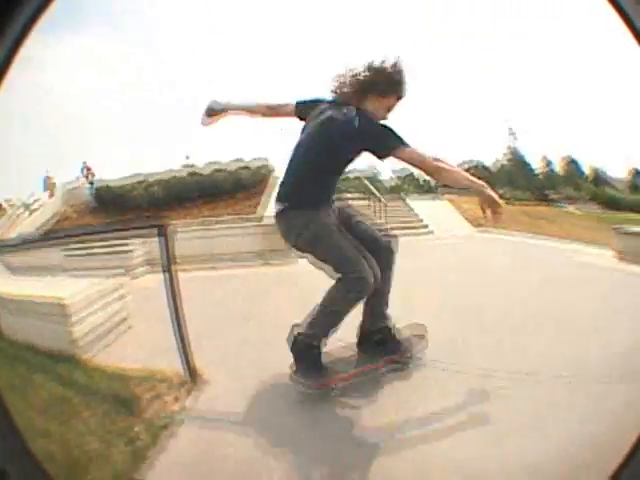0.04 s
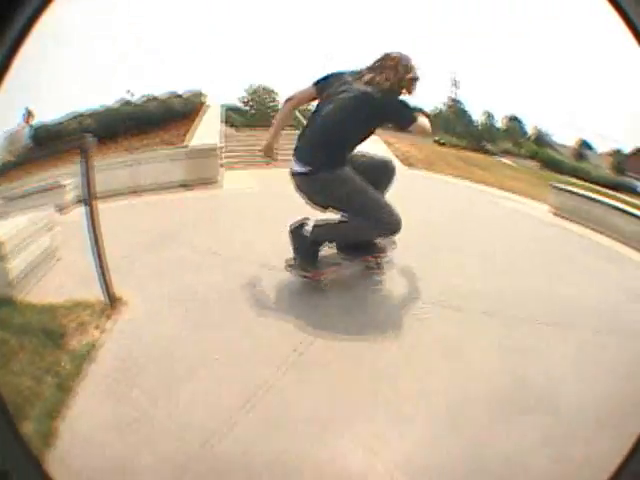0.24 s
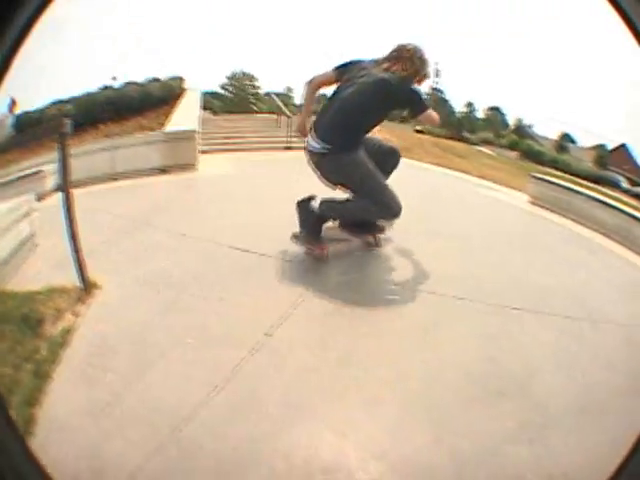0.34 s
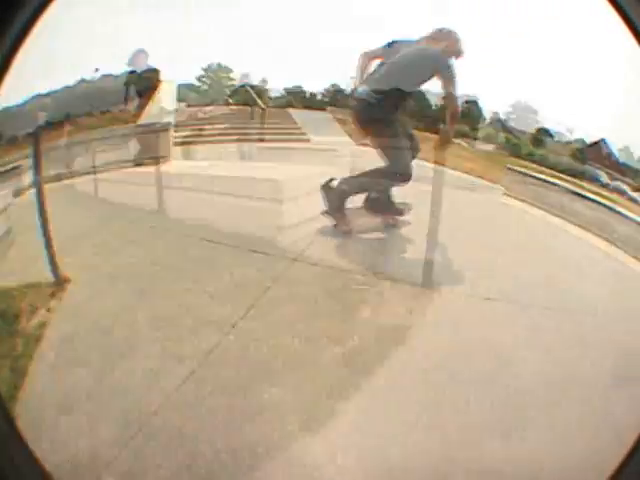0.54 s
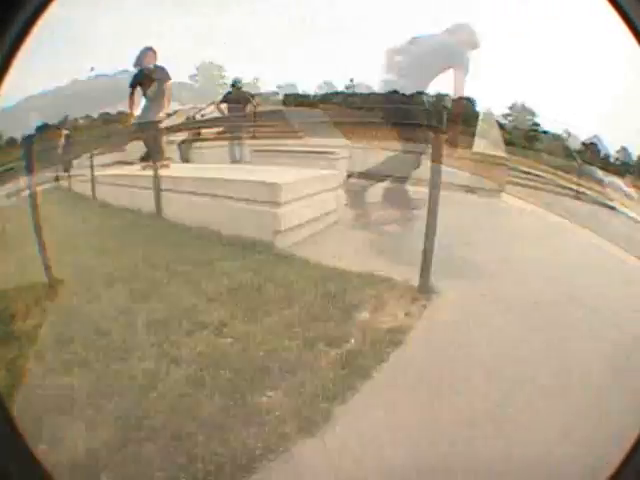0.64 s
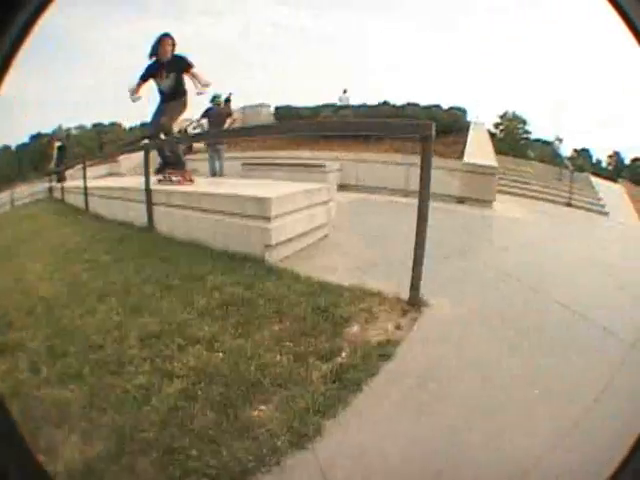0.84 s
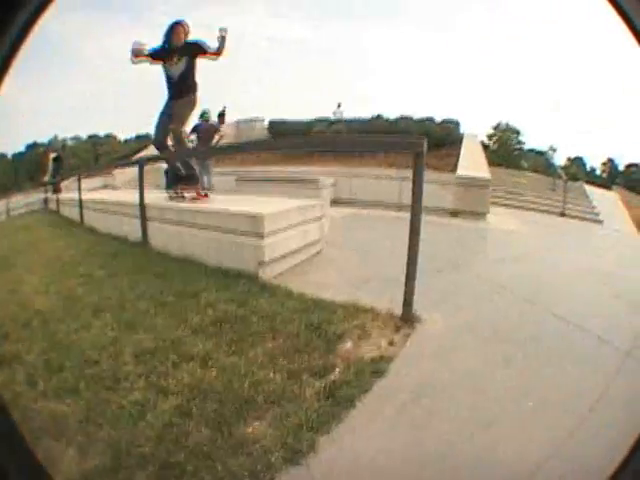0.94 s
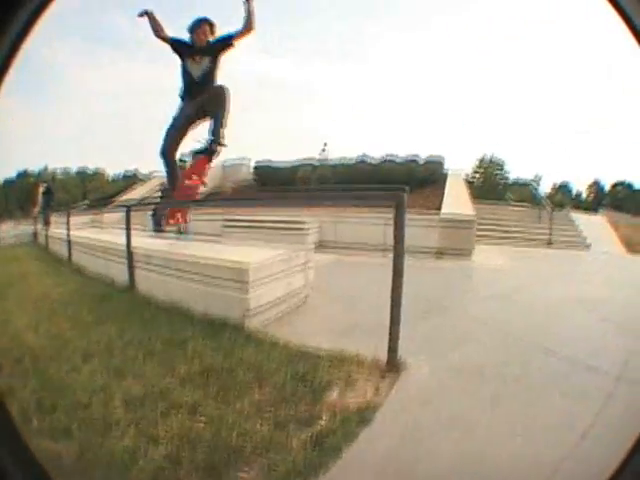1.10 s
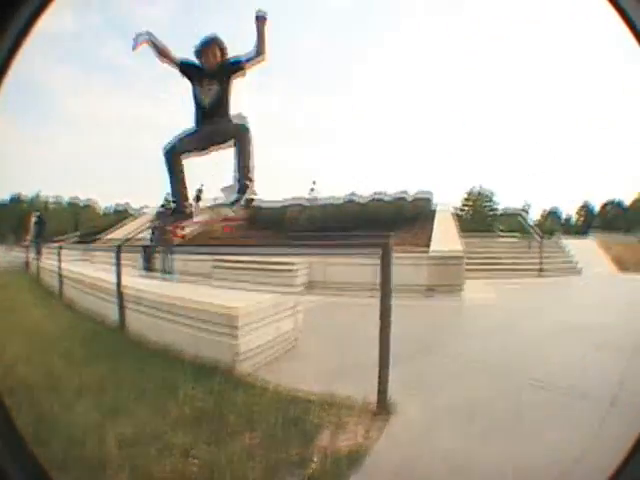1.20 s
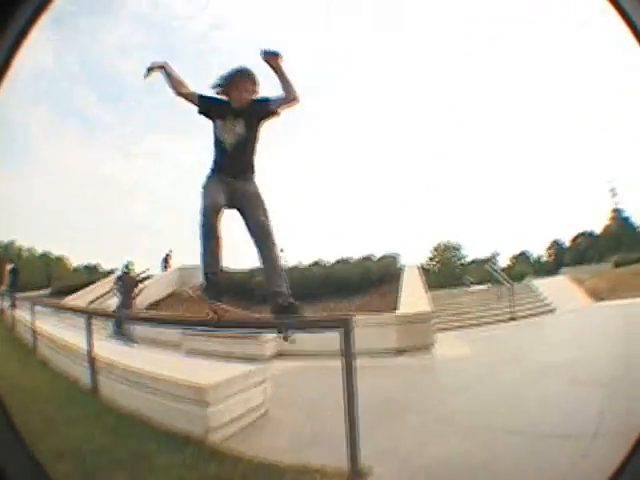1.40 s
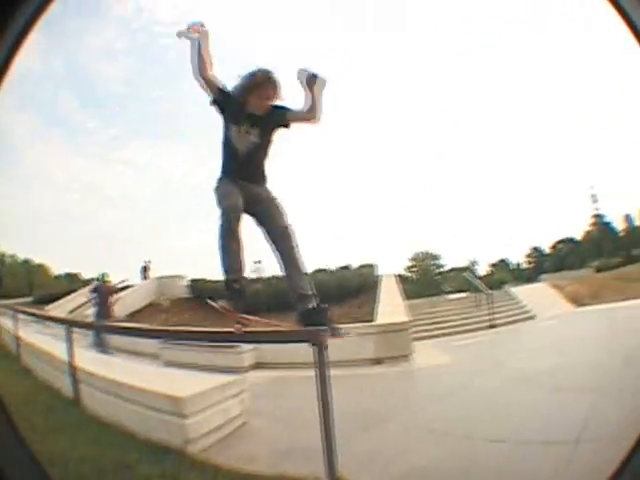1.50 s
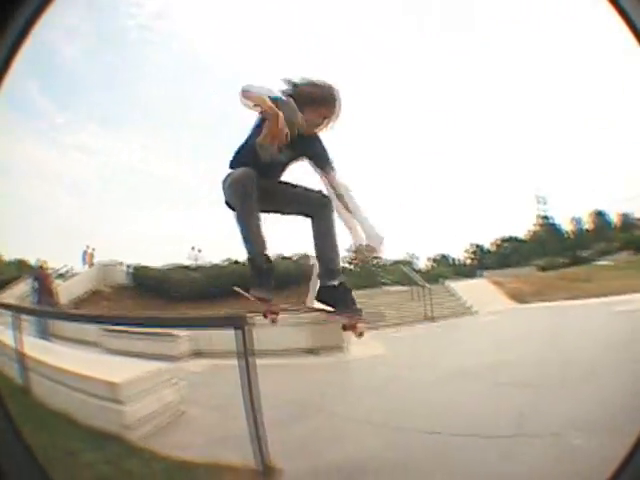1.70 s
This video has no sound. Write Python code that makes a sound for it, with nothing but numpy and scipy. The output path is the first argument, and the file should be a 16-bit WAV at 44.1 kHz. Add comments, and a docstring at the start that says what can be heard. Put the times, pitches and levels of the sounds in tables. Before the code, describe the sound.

A skateboard slaps onto concrete, rolls, then pops up and grinds a ringing metal rail.

```python
"""A concrete skate spot in the open air. A skateboard slaps down, tail then nose: each blow is a gritty
crack, a woody ring and a thump of the flexing deck. It rolls away and clunks over a joint in the slab.
A steel rail rings from a farther knock; the board pops off a ledge, lands on the rail and grinds along
it, the truck sticking and slipping. A small, close stereo microphone overloads on the hardest blows."""
import sys
import numpy as np
from scipy import signal
from scipy.fft import rfft, irfft
from scipy.io import wavfile
from scipy.ndimage import uniform_filter1d, map_coordinates

SR = 44100
rng = np.random.default_rng(int(sys.argv[2]) if len(sys.argv) > 2 else 0)


def persist_wave(psi):
    """Save psi, clipped to +-1, as 16-bit WAV."""
    counts = np.round(np.clip(psi, -1, 1) * 32767).astype(np.int16)
    wavfile.write(sys.argv[1], SR, np.atleast_2d(counts).T)


N = 77175
T = np.arange(N) / SR

# how alike left and right are (frequency [Hz], likeness [0-1])
STEREO_LIKENESS = [(40, 0.7), (150, 0.95), (800, 0.99), (1500, 0.93), (2800, 0.62), (4500, 0.056),
                   (15000, 0.3)]
# colours of the air, the low hum and the deep rumble (frequency [Hz], level per Hz [dB])
AIR_COLOUR = [(15, -41.5), (25, -16), (144, -2), (164, -32), (198, -1), (305, -15.5), (340, -47),
              (399, -10.5), (945, -10.5), (1110, -5), (1530, -14.5), (5140, -23.5), (15500, -37.5)]
HUM_COLOUR = [(100, -34), (145, 2), (165, 1.5), (225, -29), (600, -76.5)]
SUB_COLOUR = [(25, -6), (80, 9), (160, -28), (600, -73)]
# swell of the deep rumble (time [s], level [dB])
SUB_SWELL = [(.3, -84), (.52, -52), (.65, -56.5), (.85, -75)]
# colour of the scatter off steps and ledges (frequency [Hz], level per Hz [dB])
YARD_COLOUR = [(100, -10), (600, 4), (1500, -6.5), (4000, -3.5), (15000, 2)]

# wheels on concrete, near and then far (time [s], level [dB])
ROLL_LEVEL = [(0, -50.5), (.10, -46), (.15, -42), (.21, -42), (.34, -41.5), (.45, -49.5), (.62, -46),
              (.70, -63.5), (1.0, -36.5), (1.15, -42.5), (1.22, -47.5), (1.75, -49)]
# colour of the roll (frequency [Hz], level per Hz [dB])
ROLL_COLOUR = [(50, -16), (150, -7), (380, -1.5), (550, -2.5), (780, -5.5), (1000, -5), (1350, -7.5),
               (1900, -12), (3000, -17), (6000, -26.5), (15500, -37.5)]
# wheels dropping over the joint (time [s], level [dB])
JOINT_HITS = [(0.6001, -38.5), (0.6106, -35.5), (0.6172, -36)]
# the clunk they make (frequency [Hz], level [dB], T60 [s])
CLUNK_MODES = [(366, -1, 0.1), (558, 4.5, 0.038), (900, -3.5, 0.022), (1500, 1, 0.0057), (3000, 5, 0.0018)]

# knocks on the rail (time [s], pitched ring [dB], shimmer [dB])
RAIL_KNOCKS = [(0.9076, -32, -25.5), (1.3842, -15.5, -11.5)]
# the rail's strong modes, in matching lists (frequency [Hz]) and (level [dB])
RAIL_MODE_HZ = [318, 533, 554, 738, 854, 874, 1011, 1062, 1095, 1164, 1204, 1745, 2505, 2729, 3461, 4368,
                4790, 5290]
RAIL_MODE_DB = [-15.5, -11.5, -7, -14, -13.5, -7, 3, -8, -0.5, -16.5, -18, -11, -6, -12, -11.5, -9, -1.5,
                -9.5]
# its crowd of weak modes (frequency [Hz], level per Hz [dB])
SHIMMER_COLOUR = [(100, -24), (300, -20), (430, -12.5), (580, -6), (1000, 2.5), (1500, -7), (2050, -10),
                  (2600, -1.5), (3100, -8), (5200, 0.5), (6100, -14), (10000, -24.5), (15500, -36)]
# ring-out of the steel (frequency [Hz], T60 [s])
STEEL_DECAY = [(200, 0.71), (1000, .62), (2500, 0.54), (5000, 0.29), (12000, 0.49)]
# pressure of the truck sliding on the rail (time [s], level [dB])
GRIND_PRESSURE = [(1.385, -60), (1.40, -28), (1.443, -19.5), (1.46, -25), (1.505, -29.5), (1.535, -33),
                  (1.58, -28.5), (1.66, -34), (1.70, -31.5), (1.75, -36.5)]
# colour of its rasp (frequency [Hz], level per Hz [dB])
RASP_COLOUR = [(100, -12), (350, -7), (880, -9.5), (1070, 11.5), (1300, -3.5), (2000, -4), (3500, -7),
               (5200, -13), (7000, -19), (15500, -36)]

# blows on the board (time [s], contact length [s], crack [dB], contact low cut [Hz],
# contact roll-off [Hz], deck ring [dB], thump [dB])
BOARD_BLOWS = [(0.1047, 0.0084, -3, 750, 1400, 10.5, -12.5), (0.1071, 0.0025, -4.5, 1160, 1150, -3, -20),
               (0.1121, 0.009, -18, 200, 900, -20, -3), (0.119, 0.0074, -22, 252, 3000, -42, -46),
               (0.1434, 0.0044, -4.5, 490, 1200, 3, -18.5), (0.1527, 0.0023, -20, 450, 1500, -22, -22.5),
               (0.166, 0.0029, -28, 300, 2000, -44, -22), (0.2207, 0.0027, -28, 201, 2600, -24, -20),
               (0.2459, 0.0025, -30, 570, 1070, -15, -50), (.9115, 0.0044, -47, 396, 900, -16.5, -58),
               (1.1599, .002, -11, 1350, 2530, -1.5, -41), (1.178, 0.0028, -29.5, 2510, 5000, -53, -58),
               (1.187, 0.0011, -21, 2400, 3400, -11, -41), (1.3799, 0.011, -16.5, 484, 1800, -21, -60),
               (1.3844, 0.0016, -3.5, 2980, 3860, -42, -13), (1.3867, 0.0022, -35, 463, 2680, -5, -29),
               (1.401, 0.0043, -11, 537, 1500, -30, -20)]
# ring of the wooden deck and trucks (frequency [Hz], level [dB])
DECK_MODES = [(560, -5.5), (705, -4), (900, -6.5), (1060, -14), (1385, -4), (1570, -12), (1930, -10.5),
              (2380, -8), (2750, -3.5), (3250, -9.5)]
# the board flexing on its wheels under the rider's weight (frequency [Hz], level [dB])
FLEX_MODES = [(215, -8), (255, -32), (300, 0.5), (552, -2.5), (1050, -5), (1570, -13.5)]
# the board's place, ahead and then a little left (time [s], left lead [s], right minus left [dB])
PAN_PATH = [(.65, 0.000014, .5), (.9, 0.000063, -1.7)]

AIR_LIKENESS = 0.71
OVERLOAD, CUTOFF_HZ = .97, 16000


def from_db(db):
    """Decibels to gain."""
    return 10 ** (np.asarray(db) / 20)


def rms_one(x):
    """Scale to unit rms."""
    return x / np.sqrt(np.mean(x ** 2) + 1e-20)


def fader(points):
    """Gain curve through (time [s], level [dB]) points."""
    return from_db(np.interp(T, *np.transpose(points)))


def at_hz(points, hz):
    """Read a table on a log-frequency axis."""
    f, value = np.transpose(points)
    return np.interp(np.log(hz + 1), np.log(f), value)


def butter(x, hz, kind, order):
    """Causal Butterworth filter."""
    return signal.sosfilt(signal.butter(order, np.clip(hz, 10, .48 * SR), kind, fs=SR, output="sos"), x)


def through(x, response):
    """Play a signal through an impulse response."""
    return signal.fftconvolve(np.atleast_2d(x), response, axes=-1)[:, :N]


def noise(spectrum=None, likeness=1):
    """Coloured stereo noise at unit rms, narrow in the bass and wide in the treble."""
    hz = np.arange(N // 2 + 1) * SR / N
    alike = np.clip(likeness * at_hz(STEREO_LIKENESS, hz), -1, 1)
    mid, side = rfft(rng.standard_normal((2, N)))
    stereo = np.sqrt(1 + alike) * mid + np.sqrt(1 - alike) * side * [[1], [-1]]
    colour = from_db(at_hz(spectrum, hz)) if spectrum else 1
    return rms_one(irfft(colour * stereo, N))


def decay(t60):
    """Exponential fade, 60 dB down after t60 seconds."""
    return np.exp(-np.log(1000) * T / t60)


def modes(table, t60_scale=1):
    """Stereo impulse response of a body; high modes reach the two capsules out of step."""
    out = np.zeros((2, N))
    for k, (hz, db, t60) in enumerate(table):
        sign = (-1) ** k
        phase = sign * np.arccos(np.clip(at_hz(STEREO_LIKENESS, hz), -1, 1)) / 2
        tone = np.sin(2 * np.pi * hz * T + [[phase], [-phase]])
        out += sign * from_db(db) * decay(t60 * t60_scale) * tone
    return out


def clicks(times, db):
    """One click per blow."""
    out = np.zeros(N)
    out[(np.asarray(times) * SR).astype(int)] = from_db(db)
    return out


def background():
    """The bed: open-air hiss, a fading low hum and a soft swell of deep rumble."""
    hum = from_db(-43.5) * decay(t60=3.3) * noise(HUM_COLOUR)
    air = from_db(-50) * noise(AIR_COLOUR, AIR_LIKENESS)
    return air + hum + fader(SUB_SWELL) * noise(SUB_COLOUR)


def yard_scatter(x, predelay_s=.01):
    """Concrete steps and ledges throw back a short tail."""
    tail = noise(YARD_COLOUR, AIR_LIKENESS) * decay(t60=0.16) * (T > predelay_s)
    return from_db(-16) * through(x, rms_one(tail) / np.sqrt(N))


def wheels(grain_hz=83, grain_db=2):
    """Hard wheels rumble over the grain of the concrete and clunk across a joint."""
    bumps = rms_one(butter(rng.standard_normal(N), grain_hz, "low", order=2))
    rumble = fader(ROLL_LEVEL) * rms_one(noise(ROLL_COLOUR) * from_db(grain_db * bumps))
    clunks = through(clicks(*np.transpose(JOINT_HITS)), modes(CLUNK_MODES))
    return rumble + clunks


def steel_modes():
    """The rail's long-ringing partials (frequency [Hz], level [dB], T60 [s])."""
    return [(hz, db, at_hz(STEEL_DECAY, hz)) for hz, db in zip(RAIL_MODE_HZ, RAIL_MODE_DB)]


def rail_shimmer(attack_s=0.0027):
    """The rail's weak modes blur into a wash, each band dying at its own rate."""
    crowd = rfft(noise(SHIMMER_COLOUR))
    hz = np.arange(N // 2 + 1) * SR / N
    wash = 0
    for centre, t60 in STEEL_DECAY:
        band = at_hz([(f, f == centre) for f, _ in STEEL_DECAY], hz)
        wash += irfft(crowd * band, N) * decay(t60)
    return wash * np.minimum(T / attack_s, 1)


def rail(early_age_s=0.22):
    """Knocks ring the steel; it opens still sounding faintly from a ride just before."""
    times, ring_db, shimmer_db = np.transpose(RAIL_KNOCKS)
    ring = through(clicks(times, ring_db), modes(steel_modes()))
    shimmer = through(clicks(times, shimmer_db), rail_shimmer())
    early_ring = modes([(hz, db - 60 * early_age_s / t60, t60) for hz, db, t60 in steel_modes()])
    return ring + shimmer + from_db(-31) * early_ring


def grind(slips_per_s=4000, spread_db=-1.7, softness_hz=1800):
    """The truck sticks and slips along the rail: dense clicks into the damped steel, with a rasp."""
    sizes = from_db(spread_db * np.minimum(rng.exponential(1, N), 4)) * rng.choice([-1, 1], N)
    slips = sizes * (rng.random(N) < slips_per_s / SR)
    force = butter(slips, softness_hz, "low", order=1)
    ring = rms_one(through(force, modes(steel_modes(), t60_scale=0.13)))
    rasp = rms_one(noise(RASP_COLOUR) * uniform_filter1d(np.abs(slips), size=300))
    return fader(GRIND_PRESSURE) * (from_db(-6) * ring + from_db(0.5) * rasp)


def board(attack_s=.0004, release_s=0.0012, crack_top_hz=6210, deck_t60_s=0.033, flex_t60_s=0.036):
    """Each blow cracks while the contact lasts, rings the deck and flexes the board into a thump."""
    # deck_t60_s holds at 1 kHz; higher modes die sooner
    deck = modes([(hz, db, deck_t60_s * (hz / 1000) ** -0.12) for hz, db in DECK_MODES])
    out = np.zeros((2, N))
    for start, length, crack_db, low_hz, high_hz, deck_db, _ in BOARD_BLOWS:
        grit = butter(noise(), low_hz, "high", order=2)
        grit = butter(grit, high_hz, "low", order=1)
        grit = rms_one(butter(grit, crack_top_hz, "low", order=1))
        attack = np.clip((T - start) / attack_s, 0, 1)
        release = np.exp(-np.maximum(T - start - length, 0) / release_s)
        out += from_db(crack_db) * grit * attack * release
        # the same contact colours the deck's ring
        force = butter(clicks(start, deck_db) + 1e-18, low_hz, "high", order=2)
        force = butter(force, high_hz, "low", order=2)
        out += through(force, deck)
    times, *_, thump_db = np.transpose(BOARD_BLOWS)
    flex = modes([(hz, db, flex_t60_s) for hz, db in FLEX_MODES])
    return out + through(clicks(times, thump_db), flex)


def scene(low_cut_hz=143):
    """The ride over the bed, panned from straight ahead to the ledge and rail a little to the left."""
    blows = board()
    action = blows + yard_scatter(blows) + rail() + grind()
    left, right = butter(action, low_cut_hz, "high", order=2) + wheels()
    times, leads, balances = np.transpose(PAN_PATH)
    right_delay = np.interp(T, times, leads)
    right_gain = from_db(np.interp(T, times, balances))
    right = right_gain * map_coordinates(right, [(T - right_delay) * SR], order=3)
    return np.array([left, right]) + background()


def record(dry):
    """The microphone clips flat on the hardest blows; a steep low-pass takes off the top."""
    clipped = np.clip(dry, -OVERLOAD, OVERLOAD)
    return signal.sosfilt(signal.ellip(10, .1, 80, CUTOFF_HZ, fs=SR, output="sos"), clipped)


dry = scene()
out = record(dry)
persist_wave(out)
```